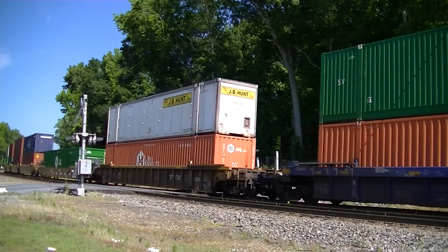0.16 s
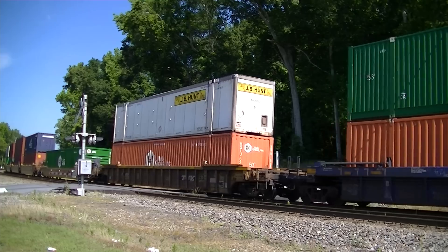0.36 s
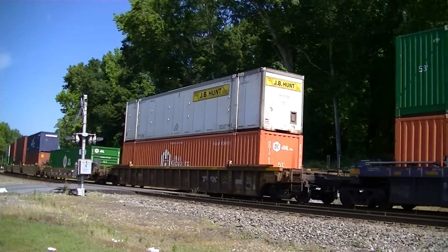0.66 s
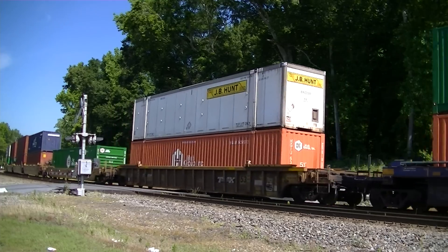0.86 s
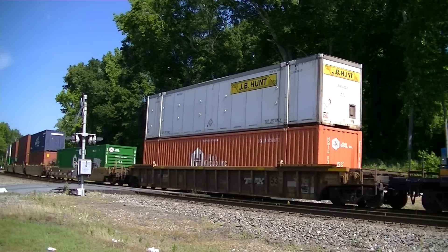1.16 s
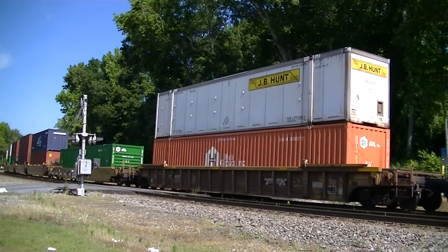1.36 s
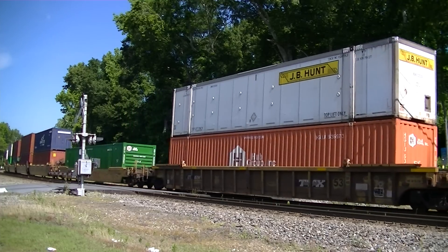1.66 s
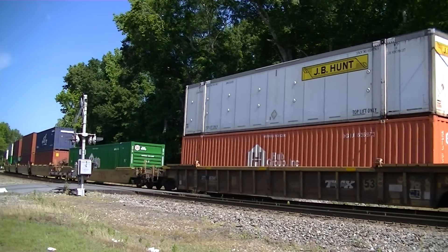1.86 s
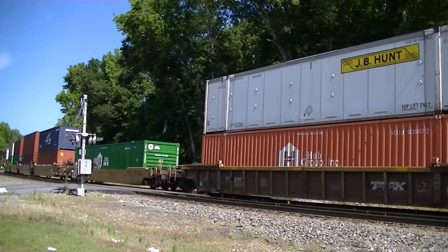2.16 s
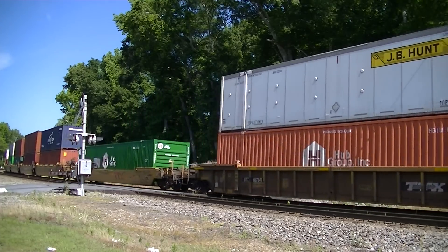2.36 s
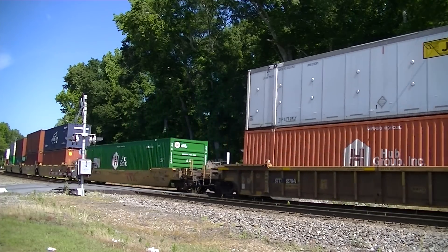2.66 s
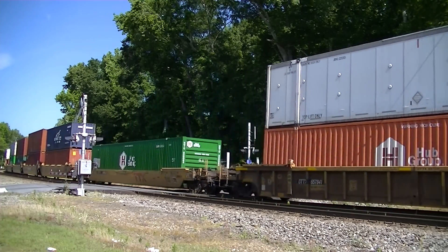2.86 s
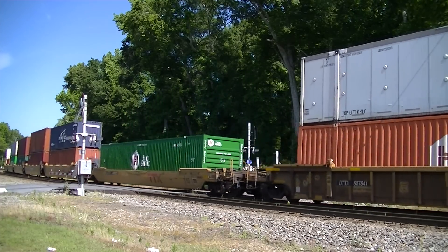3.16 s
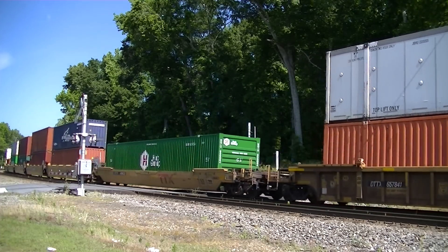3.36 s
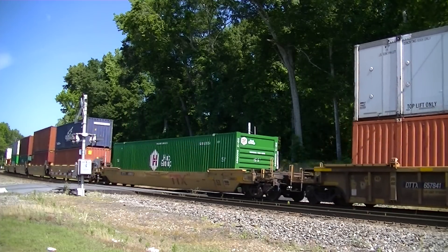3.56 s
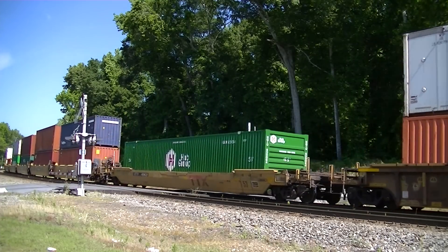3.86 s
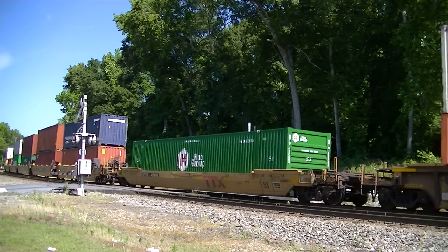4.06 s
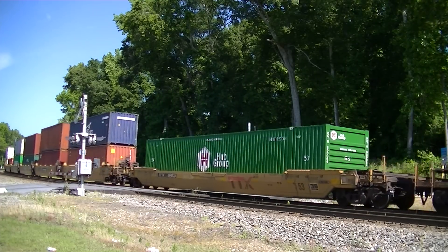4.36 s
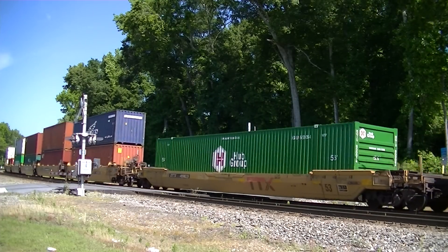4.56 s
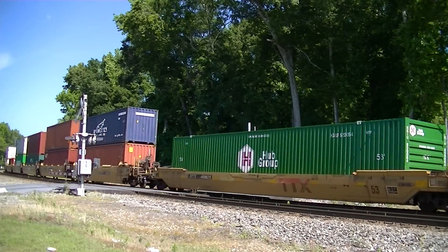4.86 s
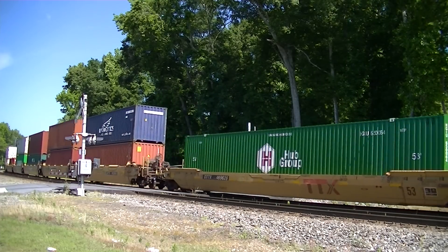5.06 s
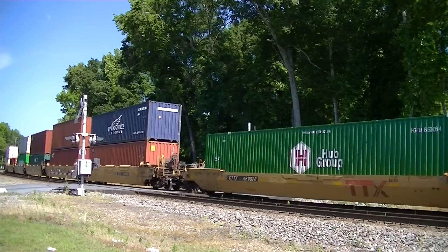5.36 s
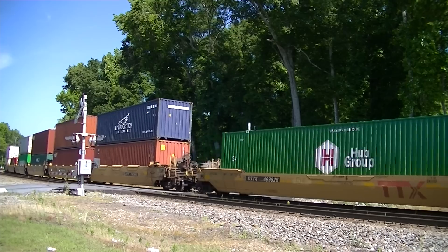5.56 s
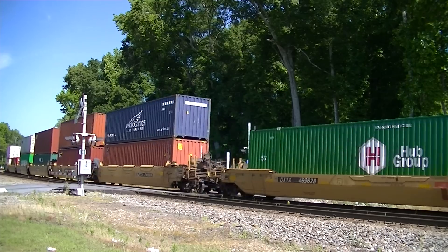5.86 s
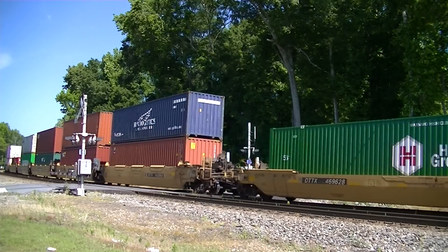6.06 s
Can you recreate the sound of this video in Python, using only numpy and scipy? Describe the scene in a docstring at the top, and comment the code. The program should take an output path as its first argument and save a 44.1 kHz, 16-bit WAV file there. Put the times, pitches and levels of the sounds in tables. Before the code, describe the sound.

Steel wheels scrape and scream against rails as loaded freight cars pass an outdoor crossing. Several high, wavering tones ring together over bright grinding noise and a midrange rolling rumble. A short lull exposes the hollow boom of a car, then a stronger scream with howls and shrieks takes over until just before the end. The nearby stereo pickup is thin in deep bass and compresses when loud.

```python
"""Loud steel squeals and gritty flange grinding over the roar of a double-stack freight train rolling through
a curve, heard from the trackside at a crossing in the woods. Friction shapes noise into the ringing modes of the
passing wheels, sinking slightly in pitch; wavering sines are the modes that lock into squeals. Coloured noise
makes the rolling roar, and resonances in noise make the drone of the car bodies. Two small microphones feed
a recorder whose gain control turns everything down when it is loud, so the squeals duck the roar."""
import sys
import numpy as np
from scipy import signal
from scipy.fft import rfft, irfft, next_fast_len
from scipy.io import wavfile
from scipy.ndimage import map_coordinates

SR = 44100
rng = np.random.default_rng(int(sys.argv[2]) if len(sys.argv) > 2 else 0)


def master(y):
    """Save y as 16-bit WAV."""
    cut = np.clip(np.atleast_2d(y).T, -1, 1)
    pcm = np.round(cut * 32767)  # scale
    wavfile.write(sys.argv[1], SR, pcm.astype(np.int16))


N = 273861
TIME = np.arange(N) / SR   # [s]

# Roar and drone of the cars, swelling as wheels come close: (time [s], relative level [dB])
ROLLING_LEVEL = [(0, -34), (1.2, -38), (1.65, -34.5), (2.1, -36), (2.4, -33), (2.9, -36), (4.65, -36.5),
                 (5.2, -39.5), (5.7, -40), (6.0, -35.5), (6.21, -35.5)]
# Colour of the rolling roar: (frequency [Hz], relative density [dB per Hz])
ROLL_SPECTRUM = [(25, -41), (60, -55), (85, -46), (110, -15), (200, -7.5), (400, -2), (900, 0.5), (1500, 1),
                 (2200, -4), (3200, -7), (5000, -10.5), (8000, -23), (12000, -41), (16000, -50)]
# Left-right correlation of the broad noise: (frequency [Hz], correlation [0-1])
LIKENESS = [(25, .5), (60, .7), (125, 0.78), (250, 0.96), (1000, 1), (6000, 0.97), (12000, 0.9)]
# Drone of the car bodies: (frequency [Hz], width [Hz], relative level [dB])
BODY_MODES = [(108, 7.8, -26), (218, 10, -16), (277.7, 13, -16)]
# One booming car wall: (frequency [Hz], width [Hz], relative level [dB])
WALL_MODE = (140.6, 16, -21.5)
# Swell of that wall over its own level: (time [s], change [dB])
WALL_BOOM = [(0, -1), (1.4, 0.5), (1.8, 3.5), (2.1, 5.5), (2.6, 10.5), (2.95, 0.5), (6.21, 2.5)]
# Faint hums of bearings and frames: (frequency [Hz], start [s], end [s], level before the gain control [dB])
HUMS = [(862, 0.67, 1.17, -44), (1020, 0.65, 1.2, -42), (1080, 3.03, 5.4, -46), (2080, 5.8, 6.3, -41.5),
        (3950, 5.75, 6.3, -49)]

# How hard the flanges press on the rail, heard as grinding: (time [s], relative level [dB])
FLANGE_CONTACT = [(0, -19), (.55, -17.5), (1.3, -19.5), (1.45, -27), (1.66, -27.5), (1.85, -35),
                  (2.22, -39.5), (2.26, -31), (2.37, -22), (2.8, -19.5), (3.72, -18.5), (4.1, -21.5),
                  (4.45, -21.5), (5.1, -19.5), (5.5, -20), (5.75, -24), (5.9, -30.5), (6.21, -38.5)]
# Colour of the grinding: (frequency [Hz], relative density [dB per Hz])
GRIND_SPECTRUM = [(600, -31), (1300, -6), (1900, 1.5), (3000, -1.5), (4400, 1), (5500, -4.5), (6350, 0.5),
                  (7400, -10), (8600, -7.5), (10500, -11.5), (12000, -21), (13500, -31), (15000, -27),
                  (16000, -31)]
# Power of the weak modes over that of the plain hiss: (frequency [Hz], ratio [dB])
RINGING = [(1400, -7), (4000, 0), (7000, 3), (10000, 7), (15000, 5)]
# Where the flanges are, positive to the left: (time [s], left minus right [dB])
BEARING = [(0, -0.6), (1.4, -0.5), (2.2, 0.5), (2.8, -1.7), (3.8, .2), (4.7, -1), (5.6, -2), (6.21, -1.5)]
# Flashes of single modes: (start [s], end [s], frequency [Hz], relative level [dB])
CHIRPS = [(1.245, 1.32, 1700, -26), (2.29, 2.46, 4590, -30), (2.292, 2.427, 5380, -33),
          (5.68, 5.788, 4470, -28)]

# Modes of each wheel: (frequency at mid-pass [Hz], relative level early [dB], relative level late [dB])
FIRST_WHEEL = [(1368, -45, -50), (1775, -39, -39), (1992, -45, -41), (2575, -41, -40), (3210, -46, -40),
               (3424, -39, -38), (3475, -38, -38), (4113, -43, -38), (4297, -35, -40), (4415, -46, -41),
               (4911, -47, -36), (5257, -41, -37), (5567, -46, -44), (5881, -49, -40), (5934, -49, -41),
               (6277, -38, -38), (6804, -48, -41), (7174, -43, -41), (7732, -54, -46), (8108, -50, -51),
               (8170, -46, -56), (8515, -44, -39), (8895, -43, -48), (9162, -46, -48), (9553, -61, -46),
               (9659, -50, -48), (10144, -50, -53), (10285, -53, -50), (11177, -58, -50), (11433, -56, -58),
               (11866, -58, -59), (11928, -62, -57), (13856, -60, -61), (13924, -65, -57),
               (14966, -69, -62), (15039, -65, -62), (15096, -62, -64), (15192, -69, -61)]
SECOND_WHEEL = [(1844, -40, -40), (1905, -38, -47), (1967, -37, -50), (2046, -41, -51), (2099, -42, -48),
                (2175, -44, -40), (2495, -42, -56), (2658, -40, -44), (2926, -42, -53), (3412, -56, -40),
                (4104, -46, -44), (4254, -41, -42), (4314, -36, -45), (4566, -36, -42), (4650, -41, -48),
                (5330, -42, -47), (5535, -44, -47), (6049, -52, -44), (6103, -47, -42), (6493, -41, -35),
                (6556, -43, -44), (6612, -43, -42), (6956, -46, -50), (7429, -49, -57), (8034, -63, -47),
                (8323, -43, -36), (8561, -48, -43), (8923, -48, -48), (9012, -63, -47), (9465, -49, -54),
                (10054, -48, -51), (10107, -49, -50), (12116, -55, -52), (12563, -60, -62),
                (13602, -65, -78), (14943, -64, -59)]
THIRD_WHEEL = [(1872, -42, -48), (2162, -41, -41), (2477, -45, -47), (3317, -44, -40), (4091, -44, -44),
               (4326, -38, -35), (4479, -37, -36), (4541, -42, -41), (5510, -45, -45), (6223, -41, -42),
               (6567, -43, -47), (6870, -51, -47), (7387, -47, -46), (7540, -47, -49), (7601, -48, -50),
               (7729, -45, -51), (8442, -47, -42), (8600, -51, -45), (9110, -56, -48), (9270, -55, -50),
               (9477, -54, -48), (9669, -52, -51), (9786, -53, -49), (10003, -53, -48), (10100, -58, -49),
               (10175, -51, -44), (10529, -50, -46), (10661, -50, -48), (10756, -63, -50),
               (10894, -55, -51), (11142, -59, -52), (11684, -55, -52), (11734, -56, -60),
               (11863, -59, -53), (12669, -60, -56), (13488, -63, -64), (13543, -60, -65),
               (14845, -55, -59), (15409, -61, -69), (15479, -63, -72)]
FAINT_WHEEL = [(1861, -46, -43), (2099, -40, -40), (3373, -47, -55), (3626, -45, -47), (4030, -41, -55),
               (6125, -49, -67), (6267, -45, -63), (6323, -45, -64), (7604, -52, -62)]
# Wheels going by: (modes [table], start [s], end [s], fade [s], relative level [dB])
PASSES = [(FIRST_WHEEL, -.2, 1.405, 0.27, 5.4), (FAINT_WHEEL, 1.45, 2.26, 0.22, -0.45),
          (SECOND_WHEEL, 2.32, 3.4, 0.085, 4.9), (THIRD_WHEEL, 3.34, 5.66, 0.36, 5.8)]

# Modes that stick-slip can lock, by name:
# (frequency at the first listed start [Hz], sag [Hz per s], rms waver [Hz], rms flutter [dB])
SQUEAL_MODES = {"first scream": (6395, 2, 4.5, 2), "upper ring": (6216, 18, 4.3, 3),
                "lower ring": (6150, 24, 4.3, 3), "cry": (4076, 16, 3, 2), "high cry": (4985, 23, 3, 2),
                "whine": (1555, 1, 3, 2), "far howl": (2686, 0, 4, 2), "low cry": (3475, 30, 8, 3),
                "far shriek": (3628, 0, 4, 3), "moan": (1852, 10, 8, 2.5), "sing": (4578, 20, 10, 3),
                "scream": (6416, 35, 7, 2.2), "howl": (2740, 7, 13, 3.2), "shriek": (3656, 12, 12, 3.2),
                "keen": (5332, 21, 4.3, 3), "whistle": (8535, 34, 12, 3)}
# Long holds and the louder bursts within them: (mode [name], start [s], end [s], relative level [dB])
SQUEALS = [("first scream", 0, 1.1, -25), ("first scream", .77, .94, -20.5),
           ("first scream", 1.25, 1.694, -31), ("upper ring", .2, 0.72, -26.5),
           ("lower ring", .76, 1.4, -25.5), ("cry", 0, 1.38, -33.5), ("cry", 0.45, 0.61, -22.5),
           ("cry", 1.1, 1.26, -26.5), ("high cry", 0, 1.33, -33.5), ("high cry", 1.02, 1.2, -24.5),
           ("low cry", 0.394, .6, -28.5), ("far shriek", 1.66, 1.9, -41.5), ("whine", 0, 3, -38),
           ("whine", 0.053, 0.15, -29.5), ("whine", 1.58, 1.75, -31.5), ("whine", 1.99, 2.135, -31.5),
           ("whine", 2.36, 2.53, -30.5), ("whine", 2.76, 2.87, -34), ("whine", 3.16, 3.26, -29.5),
           ("far howl", 0, 1.435, -34.5), ("far howl", 1.58, 1.686, -30.5), ("far howl", 1.94, 2.1, -41),
           ("far howl", 5.79, 6.04, -32.5), ("far howl", 6.16, 6.25, -29), ("scream", 2.35, 2.92, -28),
           ("scream", 2.93, 5.55, -23), ("scream", 3.06, 3.13, -16), ("scream", 3.38, 3.66, -20),
           ("scream", 3.76, 3.87, -13.5), ("scream", 3.95, 4.07, -16.5), ("scream", 4.28, 4.5, -14),
           ("scream", 5.2, 5.24, -17.5), ("scream", 5.44, 5.55, -18.5), ("howl", 2.32, 5.5, -33.5),
           ("howl", 2.5, 2.554, -27), ("howl", 3.63, 3.72, -24.5), ("howl", 3.733, 3.78, -22.5),
           ("howl", 4.7, 4.8, -27), ("howl", 2.72, 3.04, -32), ("howl", 3.15, 3.5, -30),
           ("howl", 4.98, 5.03, -27.5), ("shriek", 3.36, 3.46, -28), ("shriek", 2.34, 2.44, -26.5),
           ("shriek", 3.35, 5.62, -33), ("shriek", 3.55, 3.64, -23.5), ("shriek", 3.78, 3.81, -22),
           ("shriek", 4.2, 4.29, -26), ("shriek", 5.41, 5.49, -23), ("moan", 2.68, 3.0, -35),
           ("sing", 2.5, 5.45, -35), ("sing", 5.08, 5.18, -27), ("keen", 3.45, 5.4, -36),
           ("keen", 3.97, 4.28, -29.5), ("whistle", 3.67, 5.5, -35), ("whistle", 3.82, 4.45, -31.5)]

DOPPLER_FALL = .0055   # share of the pitch lost per second
FULL_GRIND_DB, TREBLE_GROWTH = -20, 1.38   # firm contact; dB of treble gained per dB of contact
SQUEAL_ATTACK_S, SQUEAL_RELEASE_DB_PER_S = 0.034, 165
AGC_THRESHOLD_DB, AGC_SHARE, AGC_TIME_S = -28, .44, 0.031   # the share is of the excess in dB
CUTOFF_HZ = 15700


def from_db(db):
    """Decibels to amplitude gain."""
    return 10 ** (np.asarray(db) / 20)


def rms_one(x):
    """Scale to unit power."""
    return x / np.sqrt(np.mean(x ** 2) + 1e-20)


def in_time(rows):
    """The columns of a time curve, read at every sample."""
    s, *columns = np.transpose(rows)
    return [np.interp(TIME, s, column) for column in columns]


def at_hz(points, hz):
    """Read a frequency curve on a logarithmic axis."""
    curve_hz, values = np.array(points).T
    return np.interp(np.log(hz + 1e-3), np.log(curve_hz), values)


def gate(start, end, fade):
    """One between two times, with straight edges that are half open at those times."""
    return np.clip(np.minimum(TIME - start, end - TIME) / fade + .5, 0, 1)


def drift(rate):
    """Slow random wandering of spread 1: noise twice through a one-pole low-pass at rate [Hz]."""
    r = np.exp(-40 * np.pi * rate / SR)   # drawn at a twentieth of the sample rate
    noise = rng.standard_normal(N // 20 + 2002)
    slow = signal.lfilter([1], [1, -2 * r, r * r], noise)[2000:]   # drop the run-in
    return np.interp(np.arange(N) / 20, np.arange(len(slow)), rms_one(slow))


def resonate(x, hz, width_hz):
    """A two-pole resonance, brought to unit power."""
    r = np.exp(-np.pi * width_hz / SR)
    poles = [1, -2 * r * np.cos(2 * np.pi * hz / SR), r * r]
    return rms_one(signal.lfilter([1, 0, -1], poles, x))


def sing(friction, hz, width_hz):
    """A lightly damped mode kept ringing by a noisy force: a narrow line with steep skirts."""
    return resonate(resonate(friction, hz, width_hz), hz, 5 * width_hz)


def sides(hz, spread_db):
    """A mode radiates in lobes: the higher it is, the more the sides differ (rms spread_db at 10 kHz)."""
    difference_db = spread_db * hz / 10000 * rng.standard_normal()
    return from_db(difference_db * np.array([[.5], [-.5]]))


def coloured_noise(spectrum):
    """Stereo noise of a given spectrum and left-right correlation, at unit power."""
    size = next_fast_len(N, True)
    hz = np.arange(size // 2 + 1) * SR / size
    mid, side = rfft(rng.standard_normal((2, size))) * from_db(at_hz(spectrum, hz))
    alike = np.clip(at_hz(LIKENESS, hz), 0, 1)
    both = np.sqrt(1 + alike) * mid + np.sqrt(1 - alike) * side * [[1], [-1]]
    return rms_one(irfft(both, size)[:, :N])


def doppler(x):
    """Ever slower reading of both sides: the pitch sinks steadily, and is true at the middle of the scene."""
    emitted = TIME + DOPPLER_FALL * TIME * (TIME[-1] - TIME) / 2
    return np.array([map_coordinates(side, [emitted * SR], order=3, mode="nearest") for side in x])


def rolling(level_db, drone_db, lump_db):
    """Rough treads on rough rail roar, and shake the car bodies into resonance."""
    shaking = rng.standard_normal(N)
    drone = sum(from_db(db) * sing(shaking, hz, width) for hz, width, db in BODY_MODES)
    hz, width, db = WALL_MODE
    drone = drone + from_db(db + in_time(WALL_BOOM)[0]) * sing(shaking, hz, width)
    roar = from_db(level_db + lump_db * drift(4.6)) * coloured_noise(ROLL_SPECTRUM)
    hums = sum(from_db(db) * gate(start, end, 0.13) * resonate(shaking, hz, 11.0)
               for hz, start, end, db in HUMS)
    return from_db(in_time(ROLLING_LEVEL)[0]) * (roar + from_db(drone_db) * drone) + hums


def grinding(level_db, treble_db, split_hz, ring_width_hz, flare_db, count):
    """Flange friction hisses, partly through weak modes that flare and fade; harder contact is brighter."""
    friction, thicket = rng.standard_normal(N), 0
    pitches = np.linspace(1400, 15500, count) + rng.uniform(-64.0, 70.5, count)
    gains = from_db(at_hz(GRIND_SPECTRUM, pitches))
    ringing_share = 1 / (1 + from_db(-2 * at_hz(RINGING, pitches)))   # share of the power
    mode_gains = gains * np.sqrt(ringing_share) / np.linalg.norm(gains)
    for hz, gain in zip(pitches, mode_gains):
        lobes = sides(hz, 2.5)
        flaring = sing(friction, hz, ring_width_hz) * from_db(flare_db * drift(1.87))
        thicket = thicket + gain * lobes * rms_one(flaring)

    # The plain hiss takes the power that the modes leave
    plain_spectrum = [(hz, db - 10 * np.log10(1 + from_db(2 * at_hz(RINGING, hz))))
                      for hz, db in GRIND_SPECTRUM]
    plain_gain = np.sqrt(np.average(1 - ringing_share, weights=gains ** 2))
    sound = plain_gain * coloured_noise(plain_spectrum) + doppler(thicket)

    def band(kind):
        """One half of the crossover: a second-order filter applied twice."""
        once = signal.butter(2, split_hz, kind, fs=SR, output="sos")
        return signal.sosfilt(np.tile(once, (2, 1)), sound)

    contact_db, = in_time(FLANGE_CONTACT)
    high_db = treble_db + TREBLE_GROWTH * (contact_db - FULL_GRIND_DB)
    return from_db(contact_db + level_db) * band("low") + from_db(high_db) * band("high")


def chirps(flutter_db):
    """As a flange bites or lets go, single modes flash up for a moment."""
    friction = rng.standard_normal(N)
    flashes = sum(from_db(db) * gate(start, end, 0.039) * sing(friction, hz, 30.)
                  for start, end, hz, db in CHIRPS)
    return flashes * from_db(flutter_db * drift(11))


def wheel(modes, start, end, fade, level_db, width_hz, lobes_db, flare_db):
    """Friction rings all modes of a wheel; as the contact point wanders, their balance changes."""
    friction, early, late = rng.standard_normal(N), 0, 0
    shift = 1 + DOPPLER_FALL * (start + end - TIME[-1]) / 2   # puts the listed pitch at mid-pass
    for hz, early_db, late_db in modes:
        lobes = sides(hz, lobes_db)
        flaring = sing(friction, hz * shift, width_hz) * from_db(flare_db * drift(3.1))
        ringing = lobes * rms_one(flaring)
        early = early + from_db(early_db) * ringing
        late = late + from_db(late_db) * ringing
    # The balance moves over the middle half of the pass
    progress = np.clip(2 * (TIME - start) / (end - start) - .5, 0, 1)
    return from_db(level_db) * gate(start, end, fade) * doppler(early + progress * (late - early))


def locked(start, end):
    """A squeal builds up quickly, holds, and rings down once the lock is lost."""
    attack = np.clip((TIME - start) / SQUEAL_ATTACK_S + .5, 0, 1)
    return attack * from_db(-SQUEAL_RELEASE_DB_PER_S * np.maximum(TIME - end, 0))


def squeal(mode, level_db, swell_db, rasp):
    """A self-excited mode: a sinking, wavering, fluttering sine with a noise skirt from uneven slipping."""
    hz, sag, waver_hz, flutter_db = SQUEAL_MODES[mode]
    rows = [row for name, *row in SQUEALS if name == mode]
    envelope = np.sqrt(sum((from_db(db) * locked(start, end)) ** 2 for start, end, db in rows))
    pitch = hz - sag * (TIME - rows[0][0]) + waver_hz * drift(24.6)
    phase = 2 * np.pi * np.cumsum(pitch) / SR
    tone = (1 + rasp * drift(110)) * np.sin(phase) + rasp * drift(140) * np.cos(phase)
    unsteady_db = flutter_db * drift(38) + swell_db * drift(7.1)
    return from_db(level_db) * envelope * rms_one(tone * from_db(unsteady_db))


def scene():
    """Squeals and grinding come from the passing wheels, the roar from the whole train."""
    wheels = sum(wheel(*passing, width_hz=16.5, lobes_db=1.0, flare_db=1.5) for passing in PASSES)
    squeals = sum(squeal(mode, level_db=1.16, swell_db=1.1, rasp=.21) for mode in SQUEAL_MODES)
    hiss = grinding(level_db=-2.9, treble_db=-20.5, split_hz=6500,
                    ring_width_hz=23.0, flare_db=3.8, count=76)
    bite = from_db(0.94 * drift(13.3))   # the flanges bite unevenly
    flanges = bite * (hiss + from_db(1.0) * wheels) + squeals + chirps(flutter_db=2.0)
    placed = flanges * from_db(in_time(BEARING)[0] * [[.5], [-.5]])
    return placed + rolling(level_db=5., drone_db=-3.0, lump_db=0.77)


def gain_control(x):
    """The recorder follows the mean power of both sides and turns them down together when it is loud."""
    power, keep = np.mean(x ** 2, axis=0), np.exp(-1 / (AGC_TIME_S * SR))
    settled = [power[:SR // 20].mean()]   # starts near the opening level
    followed, _ = signal.lfilter([1 - keep], [1, -keep], power, zi=settled)
    excess_db = np.maximum(10 * np.log10(followed) - AGC_THRESHOLD_DB, 0)
    return x * from_db(-AGC_SHARE * excess_db)


def record(dry):
    """Small microphones thin the deep bass, the right one brighter; gain control, then a steep top cut."""
    thin = signal.sosfilt(signal.butter(2, 62., "high", fs=SR, output="sos"), dry)
    treble = signal.sosfilt(signal.butter(1, 14000, "high", fs=SR, output="sos"), thin)
    picked_up = gain_control(thin + 0.18 * treble * [[-1], [1]])
    faded = picked_up * gate(.002, TIME[-1] - .002, .004)
    return signal.sosfilt(signal.ellip(10, .1, 80, CUTOFF_HZ, fs=SR, output="sos"), faded)


dry = scene()
out = record(dry)
master(out)
```